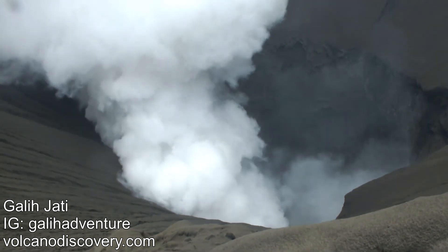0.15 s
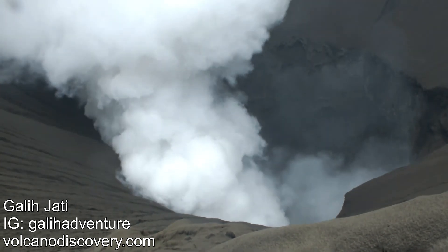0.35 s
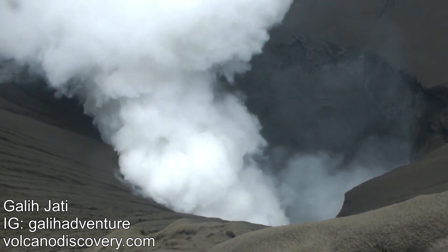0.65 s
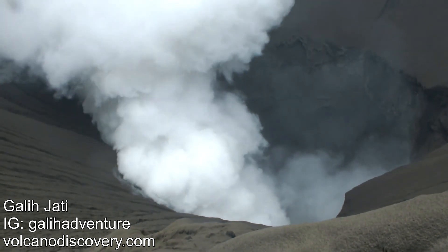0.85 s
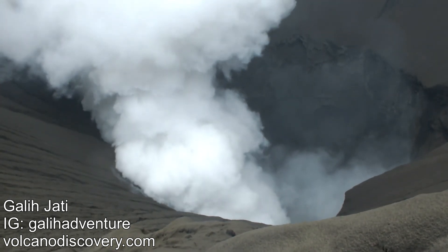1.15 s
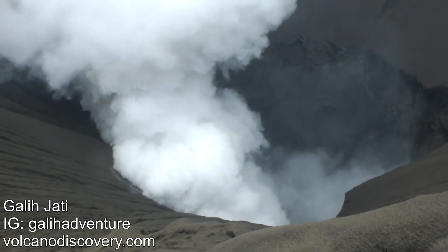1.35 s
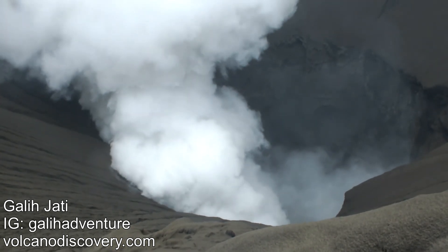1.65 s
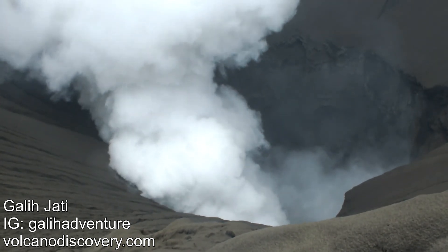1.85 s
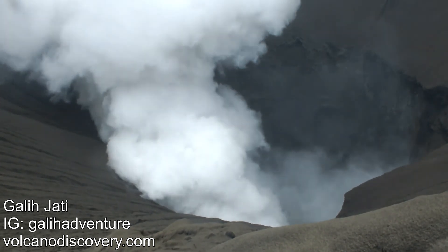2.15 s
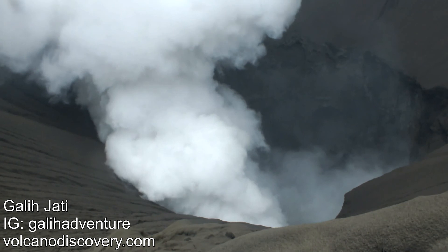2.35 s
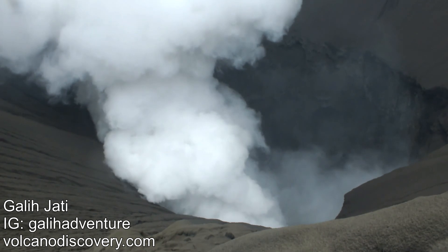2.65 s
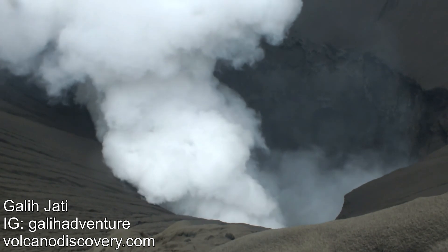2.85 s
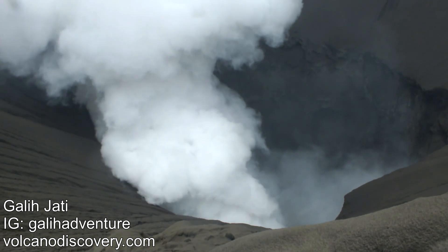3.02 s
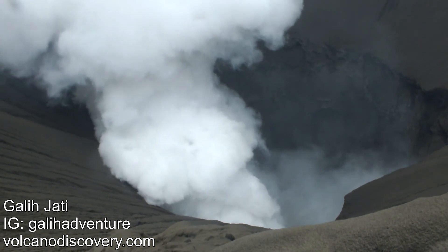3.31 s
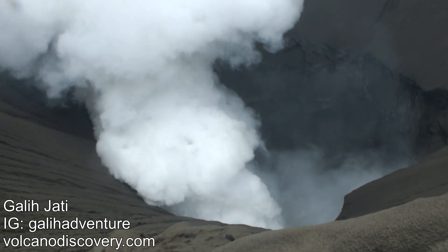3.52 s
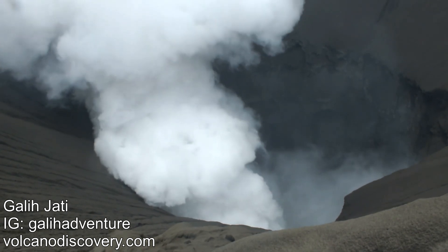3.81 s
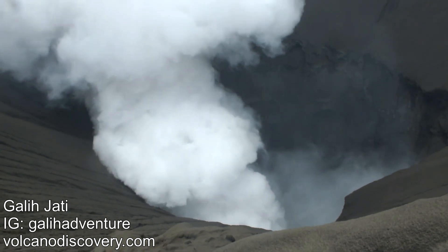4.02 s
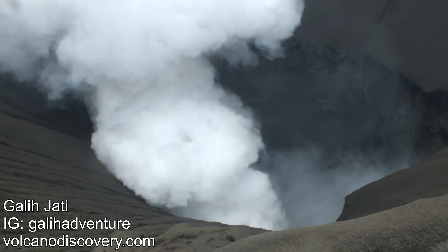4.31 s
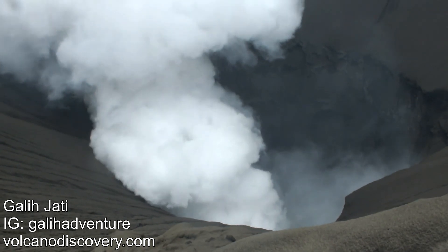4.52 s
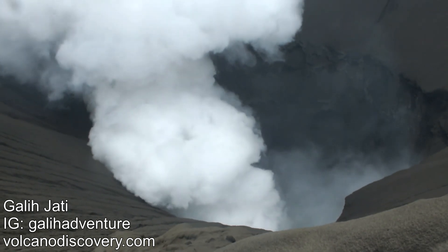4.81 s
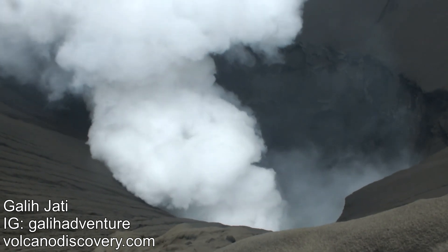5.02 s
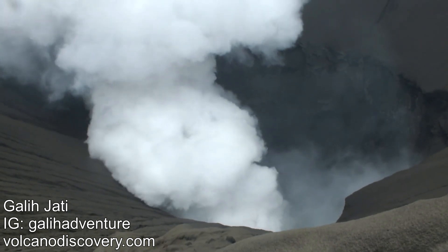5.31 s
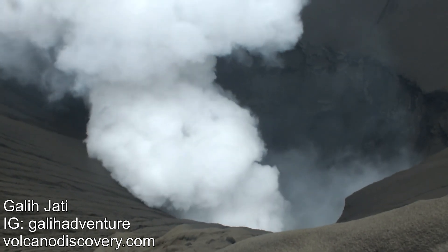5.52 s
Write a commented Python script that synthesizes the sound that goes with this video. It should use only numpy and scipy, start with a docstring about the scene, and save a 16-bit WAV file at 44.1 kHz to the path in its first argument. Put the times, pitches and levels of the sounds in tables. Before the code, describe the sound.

A volcanic crater vents steam in a continuous low, throbbing roar, with brief hollow booms and a muffled hiss above it.

```python
"""On a crater rim, a stereo camera microphone hears steam and gas rush out of a distant volcanic vent.
Large eddies rumble and boom in the hollow of the vent, and slugs of gas leave with soft thuds.
Smaller eddies roar, hiss and spit, dulled by distance. The ash slope reflects the sound and hollows
out the low middle. Behind it lie a thin whine and a faint treble hiss that flickers and wanders."""
import sys
import numpy as np
from scipy.fft import rfft, irfft
from scipy.io import wavfile
from scipy.ndimage import uniform_filter1d

SR = 44100
rng = np.random.default_rng(int(sys.argv[2]) if len(sys.argv) > 2 else 0)


def put_to_file(sound):
    """Save the sound as 16-bit audio at rate SR, in the file named by the first command-line argument."""
    columns = np.atleast_2d(sound).T  # one column per channel
    safe = np.clip(columns, -1, 1)
    whole_steps = np.round(safe * 32767)
    wavfile.write(sys.argv[1], SR, whole_steps.astype(np.int16))


N = 250047
TIME = np.arange(N) / SR
FREQ = np.maximum(np.arange(N // 2 + 1) * SR / N, 1)

# the hollow of the vent booms: (time [s], pitch [Hz], length [s], relative peak [dB])
BOOMS = [(0.983, 122, 0.071, -23), (1.138, 81.9, 0.08, -22), (1.227, 82, 0.064, -21),
         (1.532, 130, 0.07, -24.5), (1.89, 127.2, 0.079, -25.5), (2.48, 81.5, 0.13, -22),
         (2.596, 82, 0.064, -24), (2.678, 129.3, 0.06, -21), (3.38, 84.6, 0.063, -22.5),
         (4.385, 109.7, 0.055, -21), (4.573, 125, 0.085, -25), (4.93, 88, 0.071, -21)]


def from_db(db):
    """Decibels to gain."""
    return 10 ** (np.asarray(db) / 20)


def unit_rms(x):
    """Scale to unit power."""
    return x / np.sqrt(np.mean(x ** 2))


def over_time(rows):
    """Each value column of a table, joined by straight lines over time."""
    times, *columns = np.transpose(rows)
    return [np.interp(TIME, times, column) for column in columns]


def over_hz(points):
    """A table joined by straight lines over log frequency."""
    hz, value = np.transpose(points)
    return np.interp(np.log(FREQ), np.log(hz), value)


def spectrum(points):
    """Gains from (frequency [Hz], level [dB]) points, falling steeply beyond both ends."""
    skirts = np.minimum(FREQ / points[0][0], 1) * np.minimum(points[-1][0] / FREQ, 1)
    return from_db(over_hz(points)) * skirts ** 6


def swell(s, length_s):
    """A smooth rise and fall of height 1 around time s, length_s wide at half height."""
    return 2 ** -((2 * (TIME - s) / length_s) ** 2)


def drift(rate_hz):
    """A random wander with spread 1, changing up to about rate_hz times a second."""
    white = rfft(rng.standard_normal(N))
    return unit_rms(irfft(white / (1 + (FREQ / rate_hz) ** 2), N))


def eddies(shape, gain_db, flutter_db, flutter_hz, evenness):
    """Fluttering turbulence at both microphone ports; evenness (0 to 1) irons out its slow swings."""
    # how alike the two ports hear it: (frequency [Hz], coherence [0 to 1])
    likeness = [(100, .998), (500, 0.99), (1000, 0.97), (2000, 0.94), (3200, 0.76), (4400, 0.85),
                (5300, 0.66), (7500, 0.5)]
    alike = over_hz(likeness)
    mid, side = rfft(rng.standard_normal((2, N)))
    stereo = np.sqrt(1 + alike) * mid + np.sqrt(1 - alike) * side * [[1], [-1]]
    noise = unit_rms(irfft(shape * stereo, N))
    power = np.mean(noise ** 2, axis=0)
    slow_power = uniform_filter1d(uniform_filter1d(power, size=SR // 10), size=SR // 14)
    steady = noise / slow_power ** (evenness / 2)
    flutter = from_db(flutter_db * drift(flutter_hz))
    return from_db(gain_db) * unit_rms(steady * flutter)


def faint_treble(hiss_db):
    """A faint treble hiss that flickers and wanders in level, and a thin, wavering whine."""
    # slow wander of the treble hiss: (time [s], relative level [dB])
    treble_wander = [(0.1, -78.5), (0.9, -76), (1.18, -79), (2.3, -79), (2.7, -81), (3.7, -80), (4.4, -79),
                     (5.1, -77), (5.4, -75.5)]
    # its spectrum: (frequency [Hz], relative level [dB])
    treble_band = [(3000, -6.5), (7000, 2.5), (10000, -1.5), (13000, -5), (15500, -9.5)]
    # tones of the whine: (frequency [Hz], level before wavering [dB])
    tones = [(12951, -98), (14355, -91), (15609, -81.5)]
    wander_db, = over_time(treble_wander)
    white = rfft(rng.standard_normal((2, N)))
    hiss = unit_rms(irfft(white * from_db(over_hz(treble_band)), N))
    whine = sum(np.sqrt(2) * from_db(db) * np.sin(2 * np.pi * (hz * TIME + rng.random()))
                for hz, db in tones)
    treble_flicker_db = 0.6 * drift(rate_hz=14)
    waver_db = 1.5 * drift(rate_hz=10)
    return from_db(wander_db + hiss_db + treble_flicker_db) * hiss + from_db(waver_db) * whine


def reflections(sound):
    """The ash slope and camera body cancel some pitches and lift others, differently at each port."""
    # notches and peaks: (centre [Hz], width [Hz], left gain [dB], right gain [dB])
    colour = [(365.4, 22, -9.5, -12.5), (850, 61, -4.5, -5), (1136, 65, -3.5, -6), (1774, 126, -3.5, -3),
              (2695, 485, -4, 5), (3790, 390, 5, 4)]
    # balance of the ports: (frequency [Hz], left minus right [dB])
    balance = [(50, 2.5), (280, 2.35), (420, 1.6), (750, 1.2), (1000, 2.3), (1400, 0.2), (2000, 2.5),
               (4500, 0.5), (6000, 0.7)]
    # phase between the ports: (frequency [Hz], lead of the left [rad])
    lead = [(100, 0.095), (900, -0.22), (1200, -0.43), (2300, -0.77), (2700, 0.34), (3000, 0.92),
            (3350, -0.73), (3700, -0.35), (4500, -.15), (5200, -1.1), (6300, 0.17), (7000, 0.48)]
    colour_db = sum(np.outer([left, right], np.exp(-((FREQ - hz) / width) ** 2 / 2))
                    for hz, width, left, right in colour)
    half_each = np.array([[0.5], [-0.5]])
    gain = from_db(colour_db + half_each * over_hz(balance))
    phase = half_each * over_hz(lead)
    return irfft(rfft(sound) * gain * np.exp(1j * phase), N)


def spits():
    """Brief, narrow-band spits of steam flare out of the hiss."""
    # spits of steam: (time [s], length [s], centre [Hz], width [Hz], level [dB])
    flares = [(4.6, 0.07, 7000, 600, -70), (4.658, 0.05, 2050, 160, -45), (4.92, 0.055, 2060, 140, -41.5)]
    out = np.zeros((2, N))
    for s, length_s, hz, width, db in flares:
        band = np.exp(-((FREQ - hz) / width) ** 2)
        out += swell(s, length_s) * eddies(band, db, flutter_db=1.5, flutter_hz=20, evenness=0.5)
    return out


def thuds(width_s, gain_db):
    """Each slug of gas sends one soft pressure pulse up to the rim."""
    # slugs leaving the vent: (time [s], relative peak [dB])
    slugs = [(1.149, -14.5), (1.372, -15.5), (1.59, -10), (1.754, -12), (1.921, -16.5), (1.984, -13),
             (2.773, -15.5), (2.884, -19), (3.091, -8.5), (3.299, -10.5)]
    out = np.zeros(N)
    for s, db in slugs:
        age = (TIME - s) / width_s
        out -= from_db(db + gain_db) * (1 - 2 * age ** 2) * np.exp(-age ** 2)
    return out


def booms(gain_db):
    """Now and then the hollow rings up for a few cycles and dies away again."""
    phases = rng.random(len(BOOMS))
    return sum(from_db(db + gain_db) * swell(s, length_s) * np.sin(2 * np.pi * (hz * TIME + phase))
               for (s, hz, length_s, db), phase in zip(BOOMS, phases))


def choking_db():
    """The vent chokes for moments: the change in level of the rumble and of the jet."""
    # lulls in the flow: (time [s], length [s], rumble drop [dB], jet drop [dB])
    lulls = [(0.429, 0.06, 8, 1), (1.643, 0.026, 4.5, 0), (2.04, 0.077, 0, 1), (2.89, 0.05, 1.5, 0),
             (3.009, 0.023, -1, 3), (3.64, 0.13, 0, 2.5), (4.434, 0.1, 2.5, 1), (4.788, 0.094, 3.5, 1.2),
             (5.047, 0.13, 2, 2)]
    return -sum(np.outer(drops_db, swell(s, length_s)) for s, length_s, *drops_db in lulls)


def jet():
    """Smaller eddies roar, rush and hiss, shaken by the same unsteady flow and its spurts."""
    # eddy spectra at the rim, larger to smaller: (frequency [Hz], relative level [dB])
    roar_band = [(290, -14), (350, 3.5), (420, .5), (480, 1.5), (530, -1), (620, -0.5), (780, 0),
                 (950, -11)]
    rush_band = [(720, -10), (860, -1), (1000, 0), (1250, -5), (1550, -4.5), (1800, -10)]
    hiss_band = [(1400, -15.5), (1650, 2), (1950, 8.5), (2300, 4), (2750, 1.5), (3200, -5.5), (3500, -12.5),
                 (3780, -16.5), (4050, -12.5), (4650, -10.5), (5200, -17), (5600, -18.5), (6300, -25.5),
                 (7100, -29.5), (7600, -34.5), (9000, -42.5), (14000, -53.5)]
    # slow course of the jet, in relative levels: (time [s], roar [dB], rush [dB], hiss [dB])
    flow = [(0, -38, -38, -42), (0.2, -33.5, -36, -40), (0.45, -36, -36.5, -41.5),
            (0.85, -33.8, -34.5, -40), (1.25, -35.0, -37, -41.5), (1.6, -35.2, -37, -41.5),
            (2.2, -36.5, -37, -41.5), (2.45, -33.5, -35.5, -40.5), (2.62, -32.5, -35.5, -40.5),
            (2.85, -36.5, -37.5, -42.5), (3.45, -36.5, -36, -40.5), (4.05, -39, -37, -43.5),
            (4.4, -36.5, -39, -44.5), (5.0, -36.5, -38.5, -44), (5.65, -36, -38.0, -41.5)]
    # the jet spurts: (time [s], length [s], roar rise [dB], rush rise [dB])
    spurts = [(2.134, 0.044, 2.5, 3.5), (2.33, 0.055, -2, 3), (2.668, 0.047, 4, -1), (2.97, 0.062, 3, 3.5),
              (3.798, 0.089, 3, 3), (4.57, 0.05, 2, 2), (4.905, 0.07, 0, 0.5)]
    roar_db, rush_db, hiss_db = over_time(flow)
    roar_rise_db, rush_rise_db = sum(np.outer(rises_db, swell(s, length_s))
                                     for s, length_s, *rises_db in spurts)
    roar = eddies(spectrum(roar_band), gain_db=1.07, flutter_db=0.3, flutter_hz=25, evenness=0.48)
    rush = eddies(spectrum(rush_band), gain_db=1.25, flutter_db=0.93, flutter_hz=41, evenness=0.32)
    hiss = eddies(spectrum(hiss_band), gain_db=0.03, flutter_db=0.5, flutter_hz=21, evenness=0.23)
    roar *= from_db(roar_db + roar_rise_db)
    rush *= from_db(rush_db + rush_rise_db)
    hiss *= from_db(hiss_db + 0.49 * rush_rise_db)  # spurts reach the hiss only in part
    shake_db = 0.68 * drift(rate_hz=16)
    _, lull_db = choking_db()
    return (roar + rush + hiss) * from_db(shake_db + lull_db)


def vent_response():
    """The low resonances of the vent's hollow, with steep skirts."""
    # resonances: (frequency [Hz], width [Hz], relative level [dB])
    modes = [(82.8, 19, -5.5), (104.7, 5.1, -2), (130.4, 11.7, -1)]
    power = sum(from_db(db) ** 2 / (1 + ((FREQ ** 2 - hz ** 2) / (FREQ * width)) ** 2)
                for hz, width, db in modes)
    return np.sqrt(power) * spectrum([(45, -10.5), (65, 1.5), (150, -3.0), (220, -7)])


def rumble():
    """The largest eddies surge and billow and set the hollow of the vent throbbing."""
    # spectra of the largest eddies: (frequency [Hz], relative level [dB])
    deep_band = [(16, -16), (22, -7.5), (30, -3), (43, 0), (56, -1.2), (68, -6)]
    low_band = [(115, -15.5), (145, -0.5), (185, 4), (215, 1), (245, -0.65), (290, -2.5), (325, -6),
                (400, -12.5)]
    # their slow surge, in relative levels: (time [s], throb [dB], low roar [dB])
    surge = [(0, -27, -29), (0.4, -29, -27.5), (0.6, -29, -28), (0.85, -29, -29.5), (1.25, -26, -29),
             (1.7, -27, -26), (1.9, -27, -28), (2.25, -28, -26.5), (2.5, -26, -27), (2.8, -23, -28.7),
             (3.05, -23.5, -27.5), (3.3, -26.5, -27.5), (3.72, -28, -29.5), (3.95, -25, -28.5),
             (4.25, -25, -30), (4.7, -27.5, -29.5), (5.2, -29.5, -29.5), (5.65, -29, -29.5)]
    # billows of gas: (time [s], rise [dB])
    billows = [(0.12, 0.5), (0.5, 4), (1.42, 1.5), (1.6, -2), (1.74, 1), (2.18, 1), (2.98, 2), (3.295, 3),
               (3.545, 3.5), (3.885, 2), (4.105, 1), (4.385, 2.5), (4.69, 3), (5.42, -0.5)]
    throb_db, low_db = over_time(surge)
    billow_db = sum(rise_db * swell(s, length_s=0.045) for s, rise_db in billows)
    dip_under_booms_db = 1.5 * sum(swell(s, length_s) for s, _, length_s, _ in BOOMS)
    deep = eddies(spectrum(deep_band), gain_db=-35, flutter_db=0.5, flutter_hz=11, evenness=0.88)
    throb = eddies(vent_response(), gain_db=0, flutter_db=0.3, flutter_hz=14, evenness=0.91)
    low_roar = eddies(spectrum(low_band), gain_db=0.65, flutter_db=0.15, flutter_hz=22, evenness=0.8)
    deep *= from_db(0.3 * (throb_db - throb_db.mean()))  # heaves gently with the throb
    throb *= from_db(throb_db - dip_under_booms_db)
    low_roar *= from_db(low_db)
    lull_db, _ = choking_db()
    return (deep + (throb + low_roar) * from_db(billow_db)) * from_db(lull_db)


def scene():
    """The vent as it reaches the microphone on the rim."""
    plume = rumble() + booms(gain_db=1) + jet() + thuds(width_s=0.0022, gain_db=-1) + spits()
    soft_ends = np.clip(np.minimum(TIME, TIME[::-1]) / 0.002, 0, 1)
    return reflections(soft_ends * plume)


def record(dry):
    """A faint treble hiss and whine join the sound, and the camera cuts the very top."""
    cutoff_hz = 15800
    heard = dry + faint_treble(hiss_db=9.5)
    low_pass = np.clip((cutoff_hz - FREQ) / 100, 0, 1)
    return irfft(rfft(heard) * low_pass, N)


dry = scene()
out = record(dry)
put_to_file(out)
```